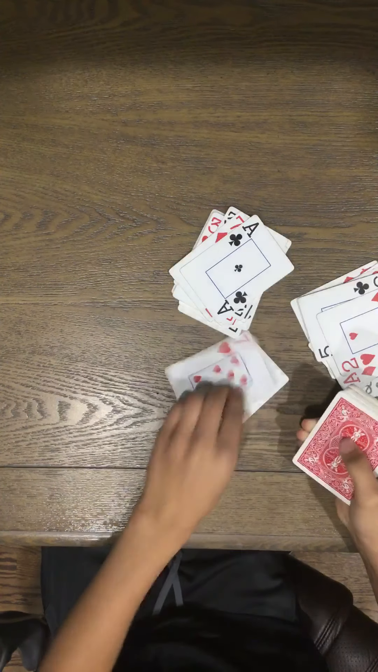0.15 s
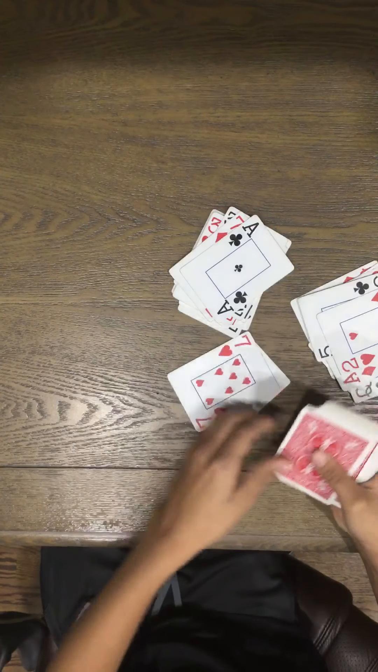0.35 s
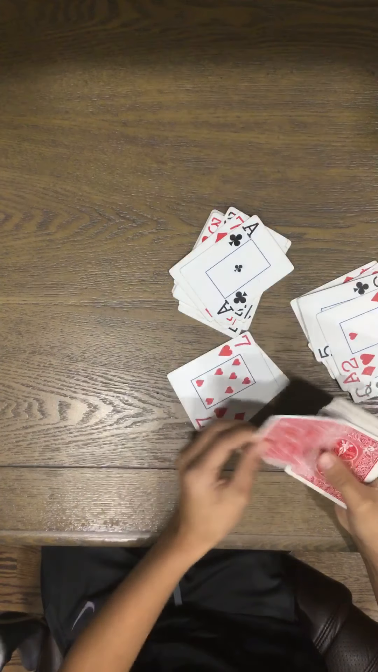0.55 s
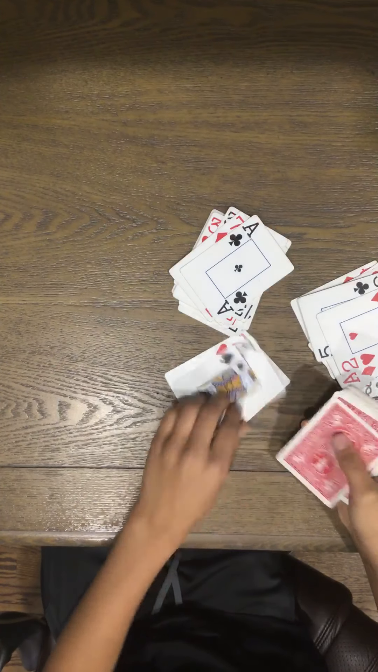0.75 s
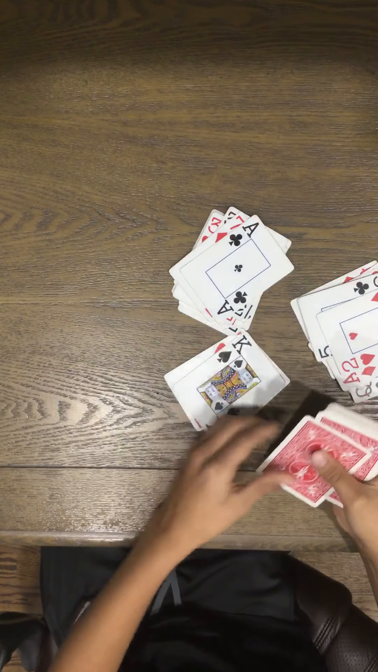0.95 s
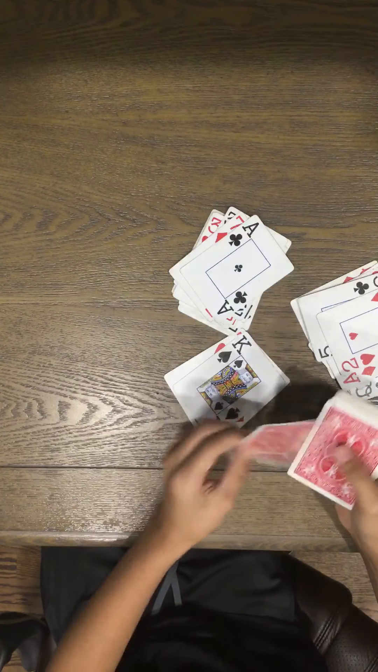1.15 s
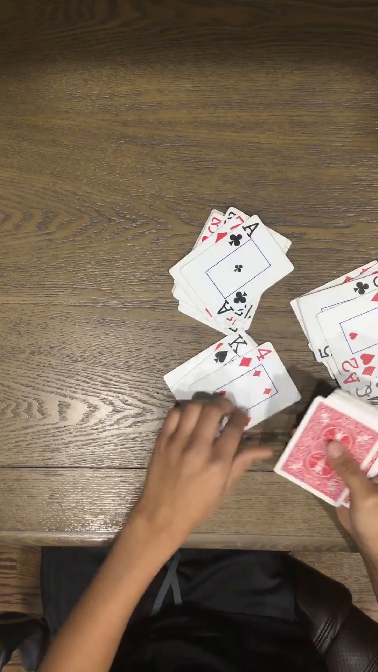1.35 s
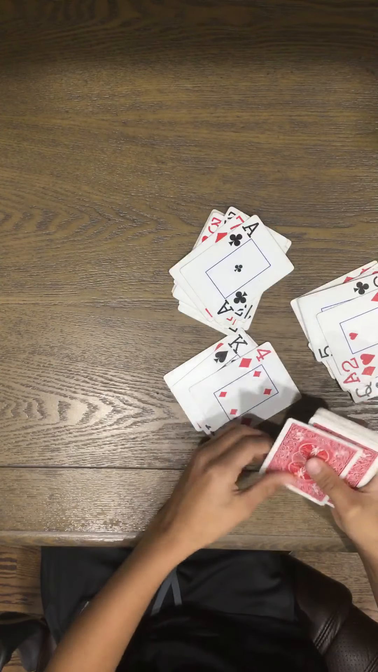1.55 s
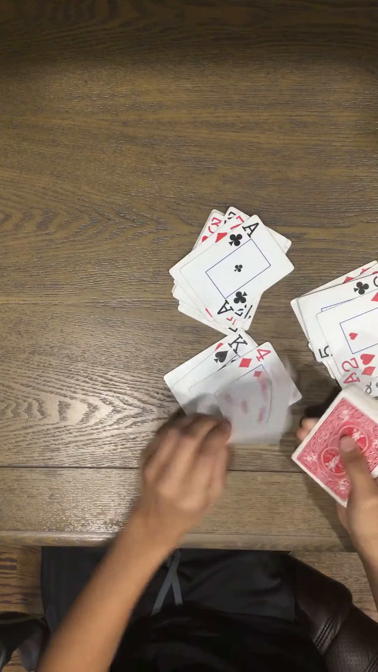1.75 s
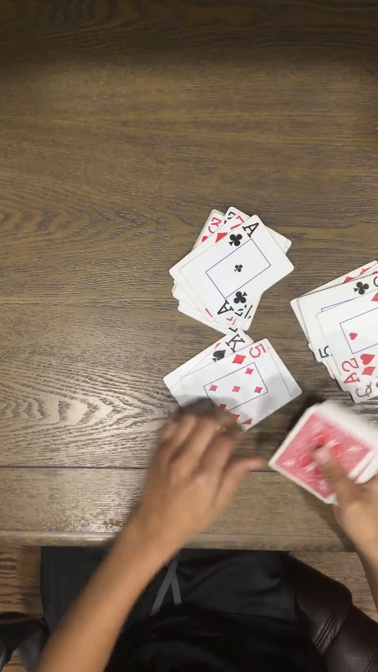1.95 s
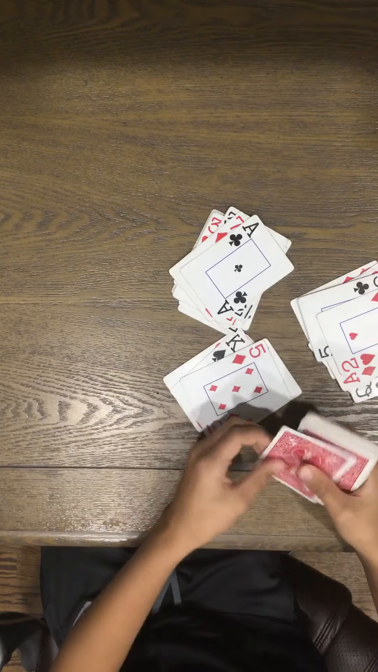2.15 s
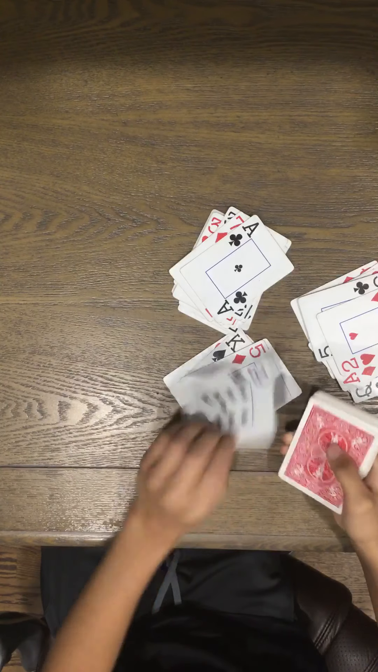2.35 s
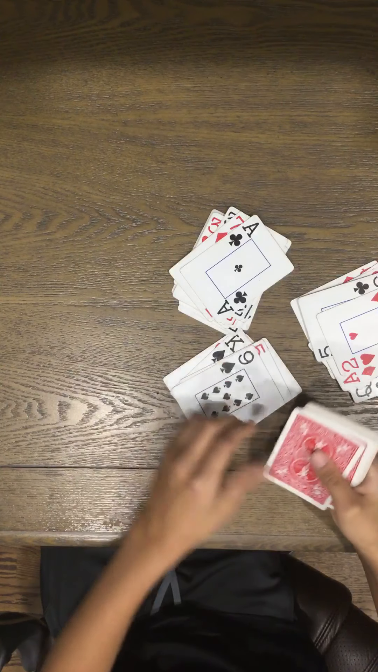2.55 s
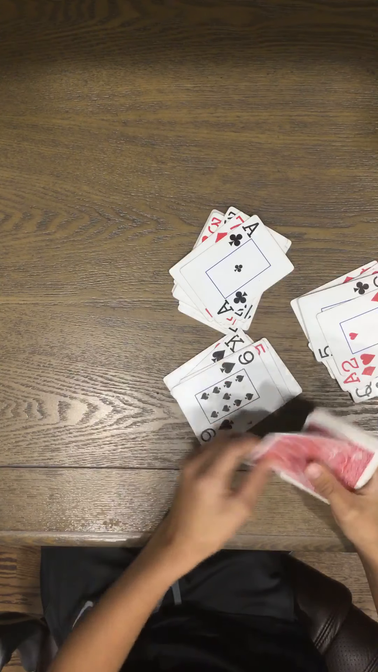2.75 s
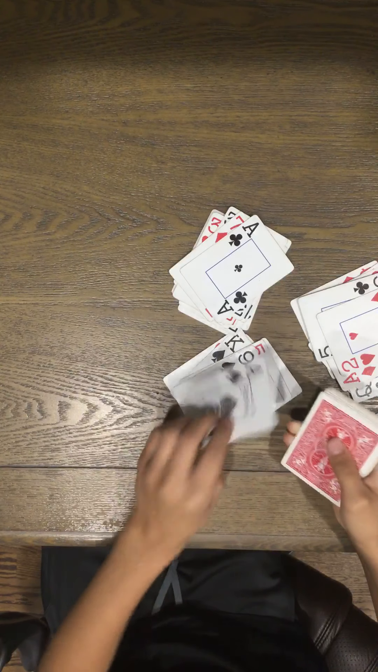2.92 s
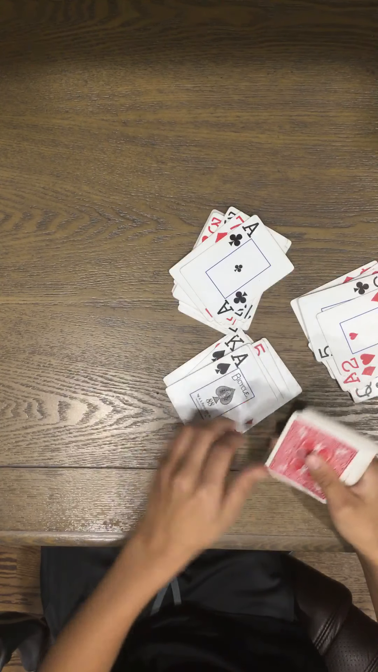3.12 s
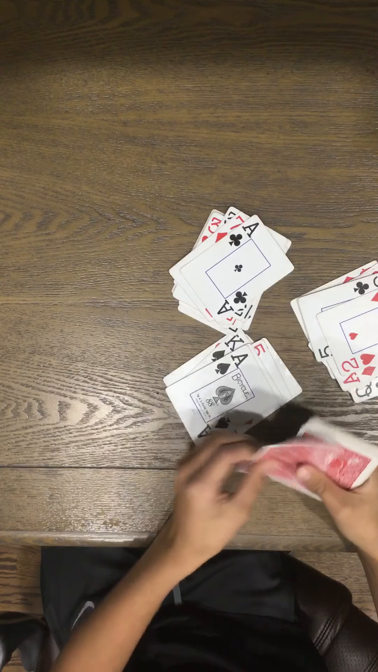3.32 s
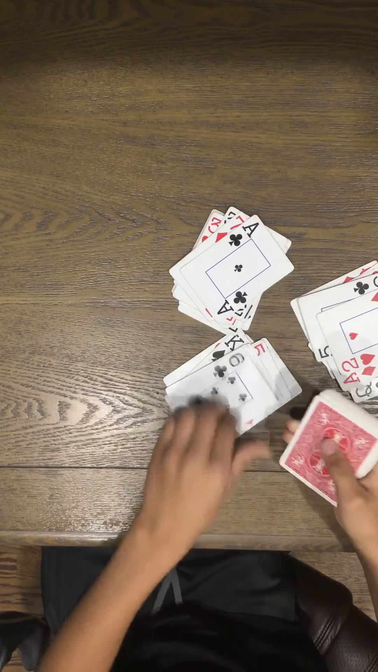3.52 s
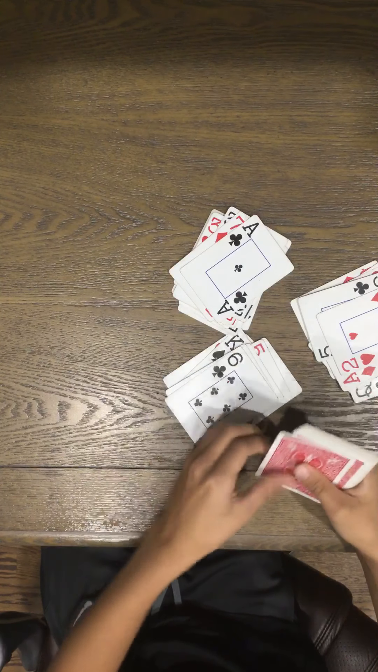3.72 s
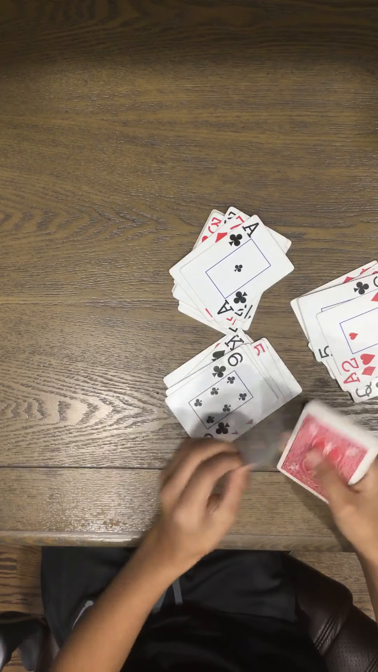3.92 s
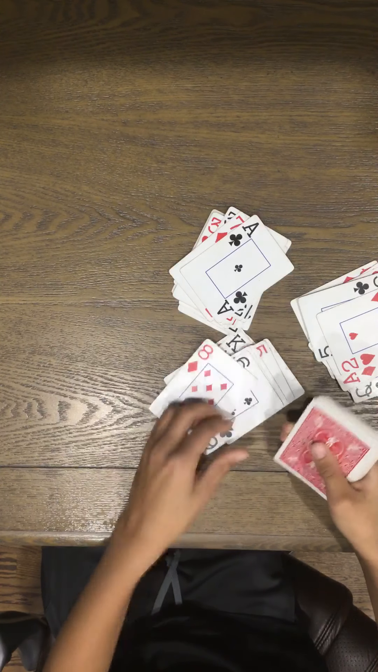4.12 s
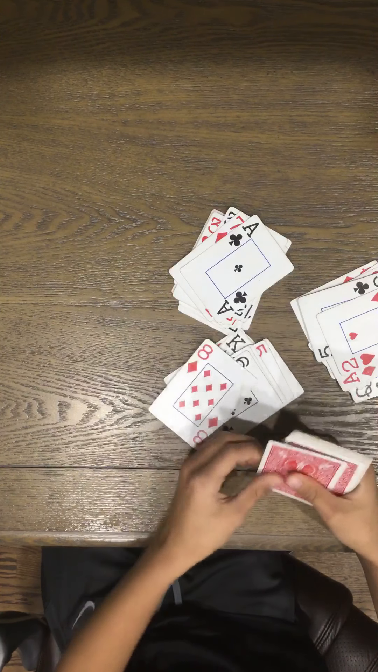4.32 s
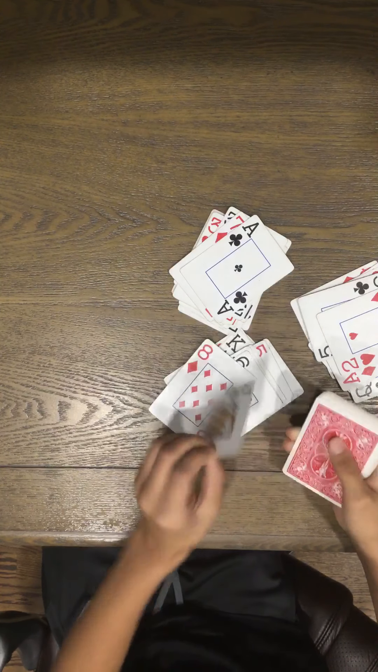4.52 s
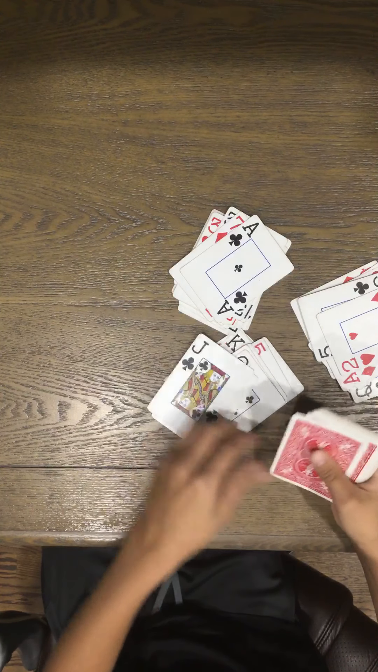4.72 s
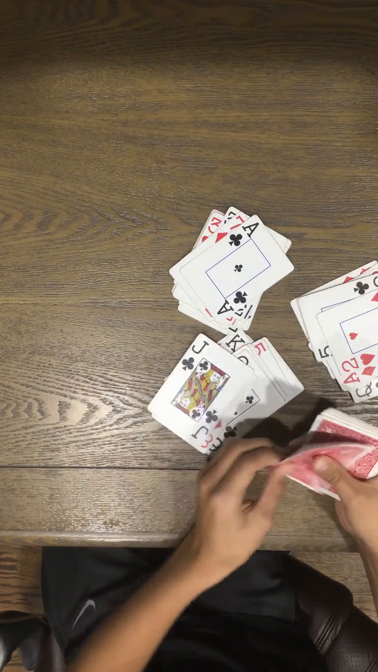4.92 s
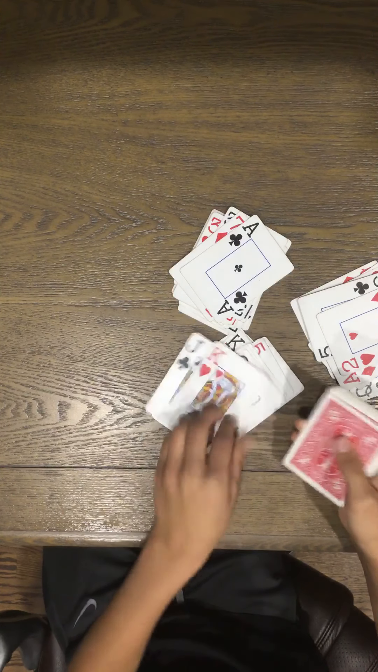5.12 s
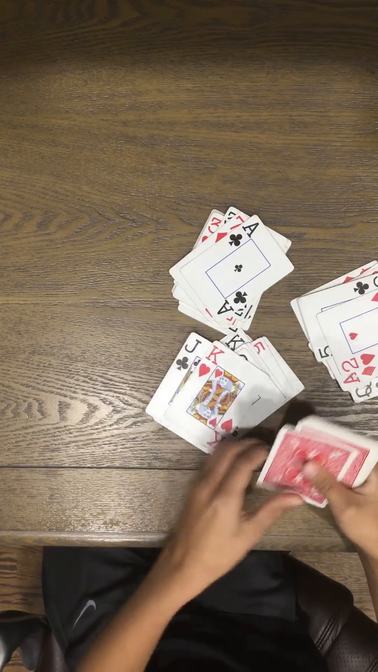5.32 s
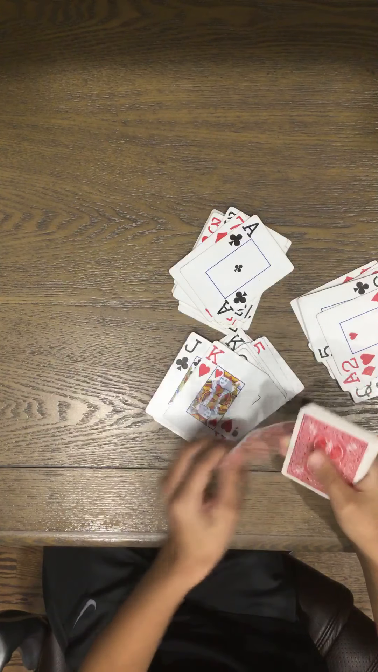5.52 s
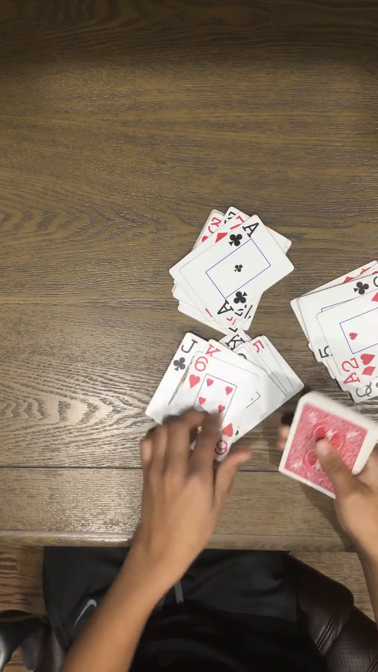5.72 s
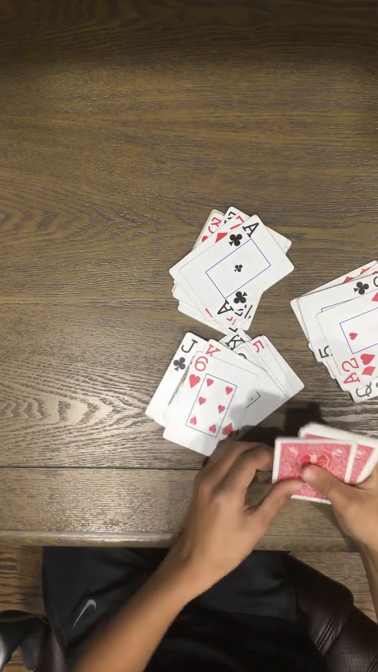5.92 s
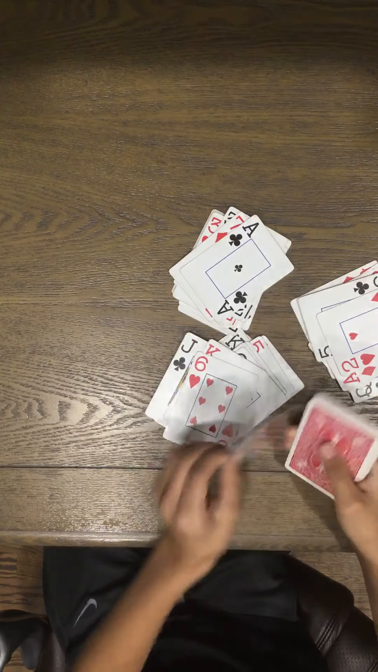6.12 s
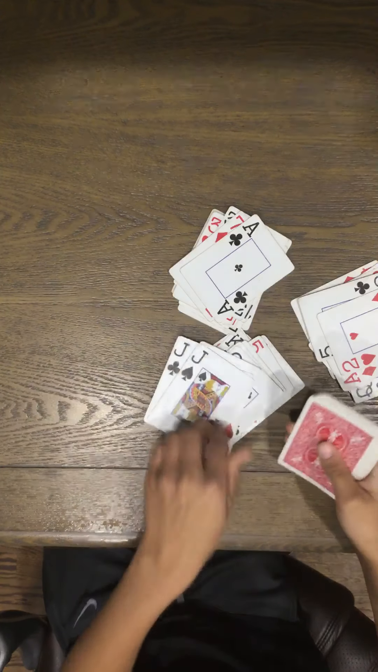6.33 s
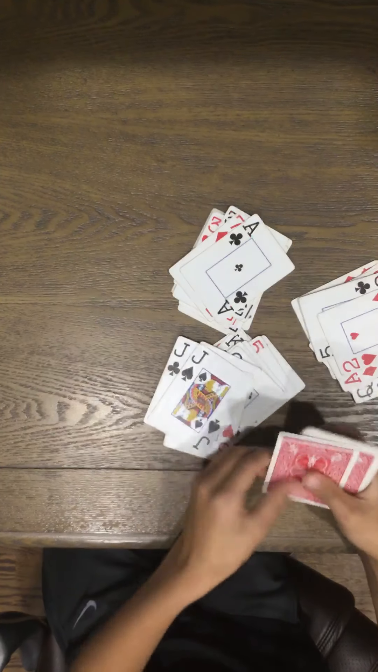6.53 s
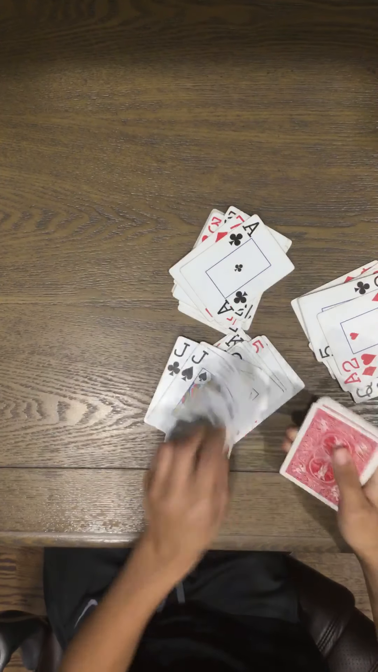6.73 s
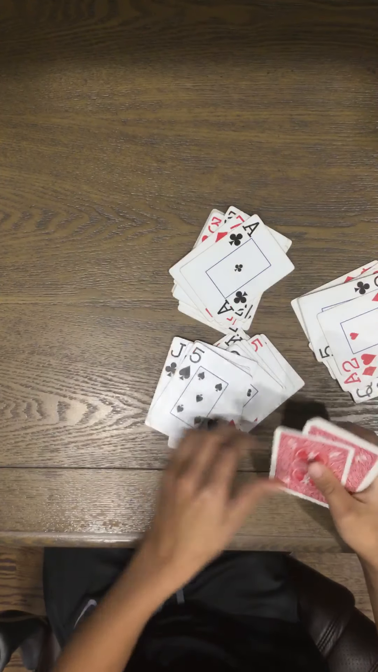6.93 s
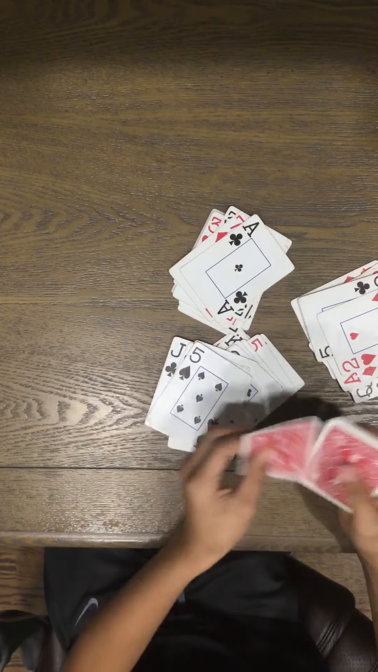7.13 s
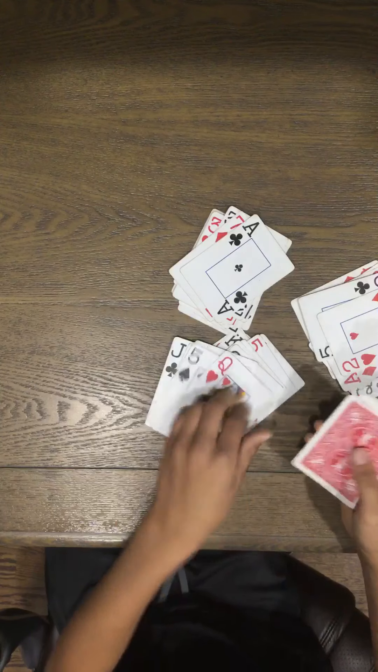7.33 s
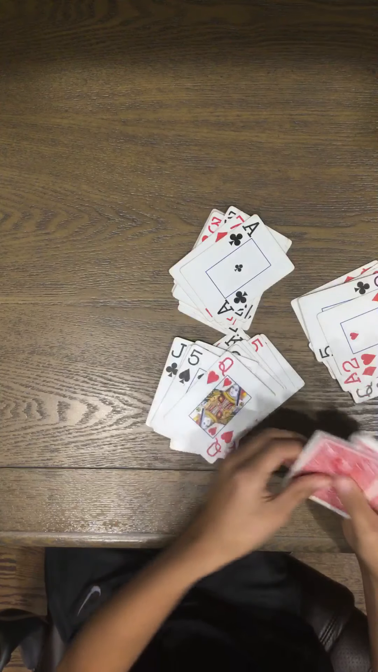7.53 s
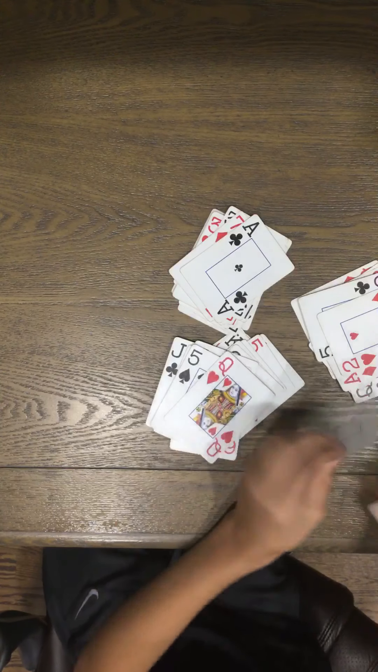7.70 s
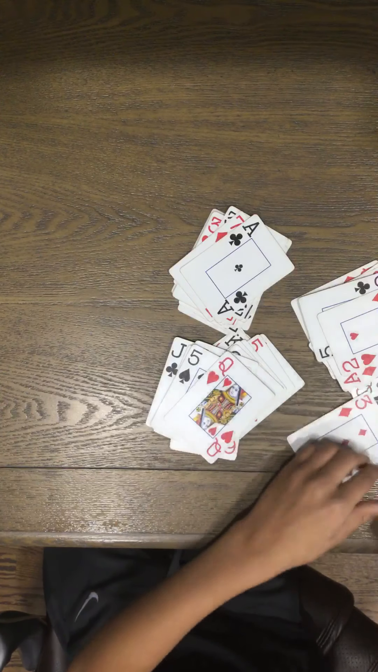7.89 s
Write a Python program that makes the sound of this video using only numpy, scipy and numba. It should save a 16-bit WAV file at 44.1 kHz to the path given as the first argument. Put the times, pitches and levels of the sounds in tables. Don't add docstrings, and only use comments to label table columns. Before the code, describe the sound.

A faint, boxy low hum fills a small quiet room throughout. Fifteen playing cards are dealt onto a wooden table at an even pace, roughly every 0.55 seconds, landing near 0.2, 0.8, 1.35, 1.9, 2.5, 3.0, 3.6, 4.1, 4.7, 5.2, 5.7, 6.3, 6.8, 7.4 and 7.9 seconds. Before each landing, fingernails may tick the deck, a thumb scrapes the card forward with a dry papery hiss, and the card bends and snaps free. Its edge often ticks the table, then air cracks out beneath it as fingers knock it flat with a short woody thump. Scrapes grow more audible after 3.4 seconds; the slap at 6.3 is especially strong, and the growing pile softens the brighter table ring. Very soft arm thuds occur occasionally. Close pickup, short room echo; the last slap is cut off near 8 seconds.

```python
import sys
import numpy as np
from scipy import signal
from scipy.fft import rfft, irfft
from scipy.io import wavfile
from scipy.ndimage import uniform_filter1d
from numba import njit

SR = 44100
rng = np.random.default_rng(int(sys.argv[2]) if len(sys.argv) > 2 else 0)


def boost(x):
    u = np.asarray(x, float) / 20
    return 10 ** u


def generate_wav(signal):
    frames = np.transpose(np.atleast_2d(signal))
    scaled = np.clip(frames, -1, 1) * 32767
    pcm = np.round(scaled).astype(np.int16)
    wavfile.write(sys.argv[1], SR, pcm)


N = 351036

# (pitch [Hz], level [dB], time to fade by 60 dB [s])
DEEP_MODES = [(67.4, 1, 0.75), (88.5, 0.5, 0.44), (101.3, 10.5, 0.15), (124, -2.5, 0.53), (151, -1, 0.072)]
MIDDLE_MODES = [(178.6, 3, 0.11), (206, -4.5, 0.063), (254, -4, 0.096), (323, -14, 0.053)]
UPPER_MODES = [(312, -36, 0.032), (373.3, 6.5, 0.23), (446, 3.5, 0.056), (461, 1, 0.086), (508, 1.5, 0.05),
               (588.5, 0, 0.17), (693, -16, 0.12), (735, -8, 0.07), (842, -11.5, 0.1), (958, -11, 0.097),
               (990, -43, 0.0447), (1206, -8, 0.058), (1400, -9, 0.024)]
# (frequency [Hz], level [dB])
SCRAPE_TONE = [(1180, 5), (2000, 4), (3310, -5.5), (5490, 0.5), (7310, 4), (10300, 4.5), (13000, 4),
               (16000, -11)]


def unit(x):
    return x / np.sqrt(np.mean(x ** 2) + 1e-30)


def match(x, model):
    return unit(x) * np.sqrt(np.mean(model ** 2))


def colour(x, points):
    hz, db = np.transpose(points)
    f = np.maximum(np.fft.rfftfreq(len(x), 1 / SR), 1)
    return irfft(rfft(x) * boost(np.interp(np.log(f), np.log(hz), db)), len(x))


@njit
def band(x, hz, share):
    y, b, l = np.empty(len(x)), 0., 0.
    for i in range(len(x)):
        g = np.tan(np.pi * hz[i] / SR)
        v = (b + g * (x[i] - l)) / (1 + g * (g + share))
        b, l, y[i] = 2 * v - b, l + 2 * g * v, share * v
    return y


def walk(rate_hz):
    k = int(SR / rate_hz)
    return uniform_filter1d(np.repeat(rng.standard_normal(N // k + 1), k), k)[:N]


def rough(count, spread_db):
    grain_db = spread_db * np.repeat(rng.standard_normal(count // 32), 32)
    return rng.standard_normal(count) * boost(grain_db)


def add(out, s, x):
    i = int(s * SR)
    out[i:i + len(x)] += x[:len(out) - i]


def hum():
    # (frequency [Hz], level [dB])
    floor_points = [(18, -63.5), (30, -10.5), (129, 4), (184, -9), (244, -3.5), (299, -29.5), (714, -42),
                    (1580, -29.5),
                    (2700, -44), (7690, -44), (9200, -40), (13500, -45.5), (14600, -93)]
    # (pitch [Hz], width [Hz], level [dB])
    booms = [(72, 5.9, -65.5), (120.4, 6.3, -61), (135.9, 4, -58.5), (243, 8.3, -78.5), (365, 11.4, -76.5)]
    out = boost(-58.5) * unit(colour(rng.standard_normal(N), floor_points))
    out *= boost(1.4 * walk(16.0))
    for hz, width_hz, db in booms:
        boom = band(rng.standard_normal(N), np.full(N, 1. * hz), width_hz / hz)
        out += boost(db + 0.28 * walk(2.68)) * unit(boom)
    return out


def room(x):
    # (pitch [Hz], time to fade by 60 dB [s], level [dB])
    echo_bands = [(130, 0.23, -5), (251, 0.23, -12.5), (442, 0.48, -10), (824, 0.54, -10),
                  (1400, 0.47, -12), (2500, 0.27, -15), (4470, 0.33, -14.5), (8900, 0.19, -17.5),
                  (13000, 0.23, -19.5)]
    t = np.arange(int(.7 * SR)) / SR
    tail = 0
    for hz, t60, db in echo_bands:
        part = band(rng.standard_normal(len(t)), np.full(len(t), 1. * hz), 0.63) * boost(-60 * t / t60)
        tail = tail + boost(db) * part / np.sqrt(np.sum(part ** 2) / hz * 8000)
    tail = tail * np.clip((t - .003) / 0.0009, 0, 1)
    return signal.fftconvolve(x, tail)[:N]


def ring_table(modes, push):
    spot_db, detune = -2.5, 0.025
    resting_s, damped_db = 0.024, -6
    t = np.arange(SR // 2) / SR
    hz, db, t60 = np.transpose(modes + modes)[:, :, None]
    chance = rng.standard_normal((2, len(hz), 1))
    fade = boost(db + spot_db * chance[0] - 60 * t / t60)
    ring = fade * np.sin(2 * np.pi * hz * (1 + detune * chance[1]) * t)
    ring = signal.fftconvolve(ring.sum(axis=0), np.gradient(push))[:len(t)]
    ring = ring * boost(damped_db * np.clip((t - resting_s) / 0.014, 0, 1))
    return ring / np.sqrt(np.mean(ring[:SR // 40] ** 2))


def leans():
    # (time [s], level [dB])
    lean_times = [
        (1.029, -55),
        (1.209, -37.5),
        (5.58, -44),
        (6.166, -37.5),
        (6.454, -45),
        (7.563, -38.5),
    ]
    out = np.zeros(N)
    for s, db in lean_times:
        add(out, s, boost(db - 7.5) * ring_table(DEEP_MODES, np.hanning(SR // 200)))
    return out


def strokes():
    # (fastest moment [s], swell [s], scrape level [dB],
    # flexing card against scrape [dB], strongest mode [Hz])
    pushes = [(0.04, 0.18, -66, 4, 1800), (0.572, 0.074, -56, -11, 1720), (1.105, 0.044, -64, -3, 1400),
              (1.655, 0.065, -58.5, -9, 1500), (2.245, 0.092, -66.5, -2.5, 1450),
              (2.795, .055, -58, -12, 1430), (3.415, 0.099, -47, -5.5, 1950),
              (3.952, 0.11, -45.5, -20, 2300), (4.42, 0.045, -63, -20, 1500),
              (5.03, 0.11, -48.5, -12, 2300), (5.545, 0.081, -46, -9.5, 2500),
              (6.11, 0.11, -53.5, -13.5, 2040), (6.655, 0.07, -54.5, -12, 1400),
              (7.185, 0.099, -46.5, -12, 2980), (7.67, 0.075, -48.5, -10, 1510)]
    # (fastest moment [s], swell [s], scrape level [dB],
    # flexing card against scrape [dB], strongest mode [Hz])
    pulls = [(0.08, 0.04, -62, 3, 3250), (0.652, 0.036, -54.5, 0.5, 2460), (1.155, 0.029, -71, 9.5, 1400),
             (1.21, 0.037, -64, 6.5, 1800), (1.725, 0.058, -64.5, 6.5, 2000),
             (2.325, 0.074, -57.5, 1.5, 2250), (2.87, 0.11, -64.5, 4, 1520), (3.45, 0.088, -61, -1.5, 2410),
             (3.985, 0.065, -55.5, 0, 2500), (4.535, 0.14, -64.5, 3.5, 1490), (5.06, 0.06, -63.5, 8, 2300),
             (5.582, 0.037, -57.5, 3, 2560), (6.165, .05, -57, 4.5, 1700), (6.70, 0.092, -57, 3, 1220),
             (7.225, 0.088, -64.5, 1, 1540), (7.71, 0.086, -58, -0.5, 1110)]
    t = np.arange(N) / SR
    gain, bend, bend_hz = np.zeros(N), np.full(N, 1e-9), np.full(N, 2e-6)
    for rows, stop, quiver in ((pushes, 617, 310), (pulls, 700, 257)):
        for s, swell_s, db, flex_db, hz in rows:
            on = slice(max(int((s - .25) * SR), 0), int((s + .25) * SR))
            swell_db = db - 29 * (np.maximum(s - t[on], 0) / swell_s) ** 1.32
            after = np.maximum(t[on] - s, 0)
            flex = boost(swell_db + flex_db - quiver * after)
            gain[on] += boost(swell_db - stop * after)
            bend[on] += flex
            bend_hz[on] += hz * flex
    return gain, bend, bend_hz / bend


def slides():
    card_hz = [862, 1080, 1420, 1850, 2300, 2880, 3480, 4800]
    gain, bend, strongest_hz = strokes()
    grains = rng.standard_normal(N) * boost(2.4 * rng.exponential(size=N)) * boost(2.7 * walk(300))
    scrape = colour(grains, SCRAPE_TONE)
    patches = 0
    for hz in 3000 * 1.2 ** np.arange(10):
        patches = patches + boost(4.5 * walk(28)) * band(scrape, hz * (1 + .03 * walk(15)), .2)
    flex = 0
    for mode_hz in card_hz:
        near_db = -10 * np.abs(np.log2(mode_hz / strongest_hz)) + 3.0 * walk(55)
        flex = flex + boost(near_db) * unit(band(grains, mode_hz * (1 + 0.049 * walk(14)), 0.076))
    return gain * boost(-3.0) * unit(patches) + bend * boost(1) * unit(flex)


def touches(rows, width, rise_s, dragged):
    out, t = np.zeros(N), np.arange(4096) / SR
    for s, hiss_db, hz, ring_db, fade_s, knock_db in rows:
        grit, centre = rough(len(t), 1.8), np.full(len(t), 1. * hz)
        drag = np.exp(-t / fade_s)
        scuff = (1 - np.exp(-t / 0.00029)) * (0.33 * np.exp(-t / 0.00081) + dragged * drag)
        hiss = unit(colour(grit, SCRAPE_TONE)) * scuff
        ring = unit(band(grit, centre, width))
        ring += min(700 / hz, .6) ** 1.5 * unit(band(grit, 2.55 * centre, 1.5 * width))
        ring = ring * (1 - np.exp(-t / rise_s)) * drag
        add(out, s, boost(hiss_db - 4.5) * hiss + boost(ring_db + 1.5) * ring)
        add(out, s, -boost(knock_db - 17) * ring_table(MIDDLE_MODES + UPPER_MODES, np.hanning(40)))
    return out


def ticks():
    # (time [s], hiss peak [dB], ring pitch [Hz], ring level [dB])
    nail_taps = [(0.4419, -52, 1290, -62), (1.0698, -44, 1030, -54.5), (1.5903, -44, 1290, -53.5),
                 (1.655, -37, 1420, -75), (2.174, -44, 1530, -56), (3.2586, -43.5, 1330, -57),
                 (3.3508, -35, 1650, -57), (4.368, -43, 1390, -61), (4.4186, -47, 1340, -82),
                 (4.8882, -34, 1630, -50), (5.426, -38, 1440, -60), (5.508, -52, 1880, -59),
                 (5.966, -44.5, 1590, -57.5), (6.54, -48, 1480, -59), (6.5856, -32, 1500, -46.5),
                 (7.061, -40, 1410, -56.5), (7.1451, -42, 2720, -56), (7.5872, -37.5, 1010, -60),
                 (7.616, -49, 1480, -58)]
    # (time [s], hiss peak [dB], ring pitch [Hz], ring level [dB], table knock [dB])
    deck_snaps = [(0.0882, -26.5, 3290, -34.5, -43.5), (0.6458, -28.5, 1420, -46.5, -64),
                  (0.6552, -46, 2630, -39, -52), (0.804, -50, 3840, -34, -70),
                  (1.2109, -41, 1140, -36, -38), (1.721, -39, 1147, -36, -39),
                  (2.1814, -45, 1104, -65, -51), (2.3277, -40, 2290, -34, -44.5),
                  (2.8791, -30, 1200, -48, -38.5), (3.4426, -31.5, 2870, -45, -46.5),
                  (3.7865, -32, 1380, -59, -47.5), (3.977, -38, 2500, -45, -51),
                  (4.5318, -42, 1360, -58, -50), (5.0285, -45, 1440, -45.5, -61),
                  (5.0536, -30, 2240, -35.5, -56), (5.5771, -50, 3000, -38.5, -41),
                  (6.1574, -47, 1470, -38.5, -43.5), (6.168, -23.5, 2240, -40.5, -60),
                  (6.2, -54, 990, -50, -40), (6.7201, -35, 1210, -47.5, -41), (6.7471, -39, 2380, -50, -49),
                  (7.727, -48, 2430, -55, -45)]
    # (time [s], hiss peak [dB], ring pitch [Hz],
    # ring level [dB], fade [s])
    edge_taps = [(0.1758, -36.5, 1230, -39, 0.0059), (0.203, -52, 2600, -45, 0.0054),
                 (0.7672, -32, 1430, -48, 0.018), (1.3223, -31.5, 1050, -43, 0.009),
                 (1.8613, -37, 1030, -37.5, 0.0086), (2.4505, -36, 1300, -40, 0.016),
                 (3.0239, -35, 1370, -43, 0.0091), (3.5701, -30.5, 1400, -46, 0.015),
                 (4.1142, -48, 3080, -41.5, 0.0088), (4.6534, -45, 2500, -47.5, 0.014),
                 (5.1509, -22.5, 1400, -31.5, 0.0071), (5.676, -41, 1360, -45, 0.025),
                 (6.264, -52, 2670, -41, 0.0076), (7.3537, -26, 2740, -33, 0.0037),
                 (7.877, -47, 1260, -53, 0.0051)]
    nails = [(s, hiss, hz, ring, 0.0049, ring - 6.5) for s, hiss, hz, ring in nail_taps]
    snaps = [(s, hiss, hz, ring, .0052, knock) for s, hiss, hz, ring, knock in deck_snaps]
    edges = [(s, hiss, hz, ring, fade_s, ring - 10) for s, hiss, hz, ring, fade_s in edge_taps]
    deck = touches(nails + snaps, width=0.089, rise_s=0.0023, dragged=0.11)
    return deck + touches(edges, width=0.3, rise_s=0.0038, dragged=0.26)


def cracks():
    # (time [s], level [dB], air pocket pitch [Hz], pocket lift [dB], share of early rush)
    air_bursts = [(0.2197, -17, 8000, 14, 0.27), (0.8068, -22, 11500, 4, .25),
                  (1.3547, -20.5, 1800, 7.5, 0.49), (1.8806, -21.5, 1830, 9, 0.39),
                  (2.4791, -20, 4580, 3, 0.4), (3.0395, -29.5, 2580, 10.5, 0.31),
                  (3.5831, -23.5, 10900, 6, 0.33), (4.1287, -27.5, 3900, 4, .36),
                  (4.6745, -24, 2960, 8, 0.4), (5.175, -26.5, 2700, 5.5, 0.48),
                  (5.714, -19, 7360, 5.5, 0.28), (6.294, -16, 2900, 10.5, .2), (6.8235, -20, 2980, 3, .08),
                  (7.3698, -19, 7440, 10.5, .36), (7.9193, -19.5, 5550, 5, .3)]
    # (frequency [Hz], level [dB])
    air_tone = [(470, -43), (800, -2), (1970, -5.5), (2600, -3), (4180, -5), (10600, -10.5), (11700, -6),
                (16000, -23)]
    near, far, lead = np.zeros(N), np.zeros(N), 1024
    t = (np.arange(4096) - lead) / SR
    after = np.maximum(t, 0)
    early = np.exp(t / 0.0045) * (t < 0)
    late = 0.41 * np.exp(-after / 0.0087) * (t >= 0)
    burst = (after / 0.0029) * np.exp(1 - after / 0.0018) + late
    puff = colour(1. * (t == 0), air_tone)
    hz = 900 * 1.3 ** np.arange(11)
    for s, db, pocket_hz, lift_db, rush in air_bursts:
        hump_db = lift_db * np.exp(-(np.log2(hz / pocket_hz) / 0.56) ** 2)
        pocket = np.transpose([hz, hump_db + 3.3 * rng.standard_normal(11)])
        air = unit(colour(colour(rough(len(t), 5.36), air_tone), pocket))
        crack = boost(db - 10.5) * (burst + rush * early) * air
        even_puff = colour(puff, np.transpose([hz, 0.78 * hump_db]))
        add(near, s - lead / SR, crack)
        add(far, s - lead / SR, match(even_puff, crack))
    return near, far


def fingers(push_s):
    out = np.zeros(SR // 30)
    pad = np.hanning(int(push_s * SR))
    late = np.array([0, .006, .013]) * (1 + 0.19 * rng.standard_normal(3))
    for late_s, db in zip(late, [0, -3, -4]):
        add(out, late_s, boost(db) * pad)
    return out


def knocks():
    # (time [s], deep modes level [dB], middle modes level [dB], strongest deep pitch [Hz],
    # strongest upper pitch [Hz])
    finger_hits = [(0.2222, -23, -26.5, 152, 600), (0.8093, -32.5, -30, 125, 736),
                   (1.3572, -25.5, -32, 122, 500), (1.8831, -20.5, -25, 129, 443),
                   (2.482, -30, -30, 105, 414), (3.0421, -29, -33.5, 124, 480),
                   (3.5855, -24.5, -36.5, 113, 650), (4.1314, -32, -46.5, 110, 400),
                   (4.677, -27, -35.5, 130, 430), (5.1772, -26.5, -30, 98, 370),
                   (5.7166, -33.5, -42.5, 129, 650), (6.2967, -23, -26.5, 98, 397),
                   (6.8257, -27.5, -31.5, 96, 370), (7.3723, -29.5, -33.5, 96, 350),
                   (7.9227, -37, -36.5, 120, 650)]
    near, far = np.zeros(N), np.zeros(N)
    first = np.exp(-np.arange(SR // 2) / SR / .011)
    for s, deep_db, middle_db, deep_hz, upper_hz in finger_hits:
        upper_db = middle_db - 0.35 - 0.53 * s
        deep = [(f, db - 16 * abs(np.log2(f / deep_hz)), t60) for f, db, t60 in DEEP_MODES]
        upper = [(f, db - 9 * abs(np.log2(f / upper_hz)), t60) for f, db, t60 in UPPER_MODES]
        groups = ((deep, deep_db, .0035, 1), (MIDDLE_MODES, middle_db, .0018, first),
                  (upper, upper_db, .0006, first))
        for modes, db, push_s, heard in groups:
            knock = -boost(db) * ring_table(modes, fingers(push_s))
            add(near, s, knock)
            add(far, s, match(knock * heard, knock))
    return near, far


def scene():
    crack_near, crack_far = cracks()
    knock_near, knock_far = knocks()
    small = ticks() + slides()
    direct = crack_near + knock_near + small
    echoes = room(crack_far + knock_far + small)
    return (direct + echoes + hum() + leans())[None]


def roll_off(x):
    return signal.sosfilt(signal.butter(12, 16500, fs=SR, output="sos"), x)


def record(dry):
    x = signal.sosfilt(signal.butter(2, 45., "high", fs=SR, output="sos"), dry)
    x = signal.sosfilt(signal.ellip(8, .3, 50, 15900, fs=SR, output="sos"), x)
    return roll_off(x)


dry = scene()
out = record(dry)
generate_wav(out)
```